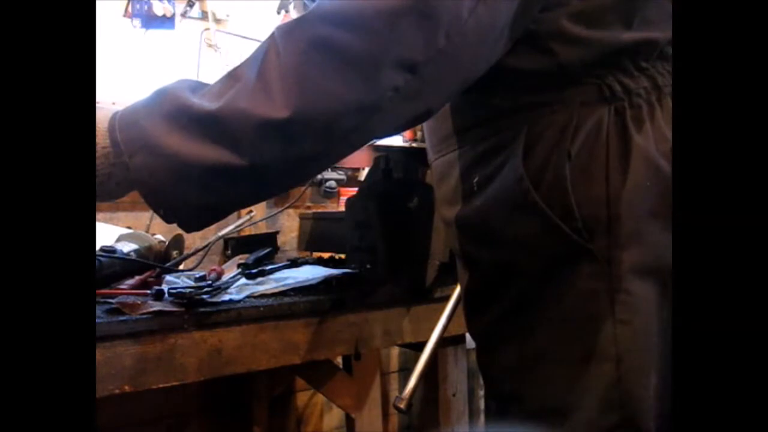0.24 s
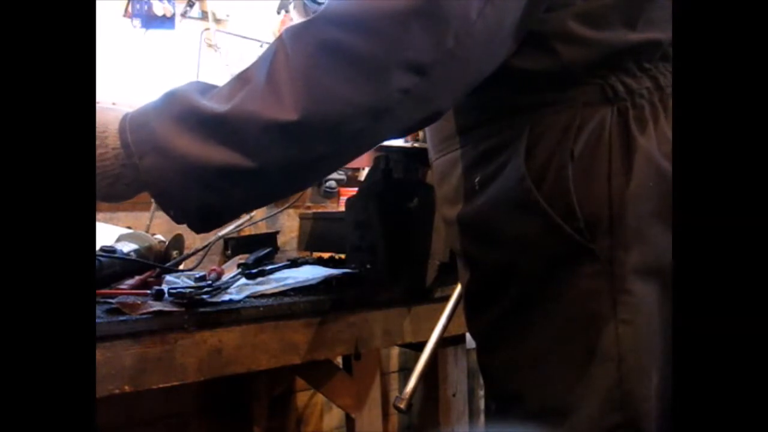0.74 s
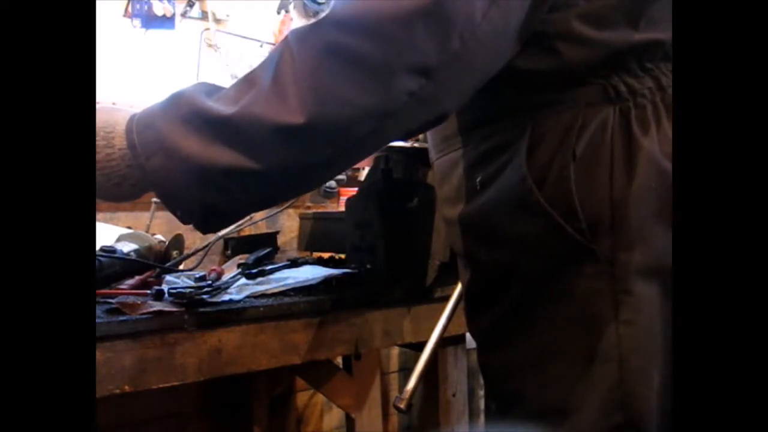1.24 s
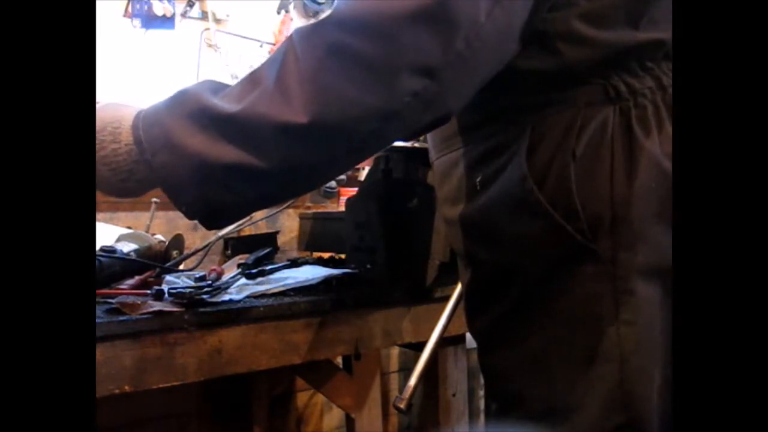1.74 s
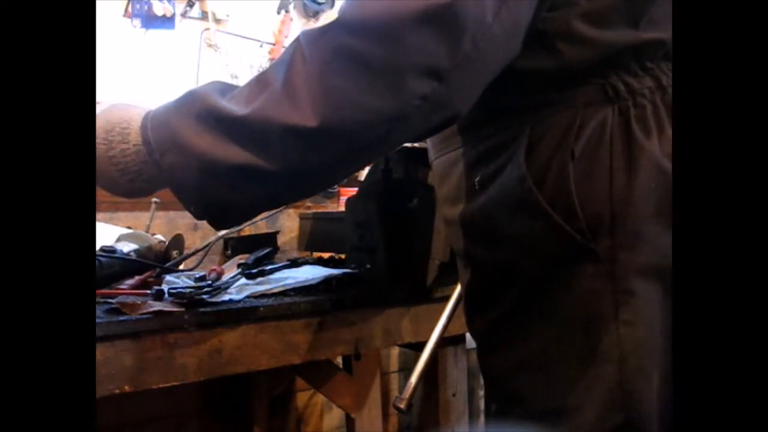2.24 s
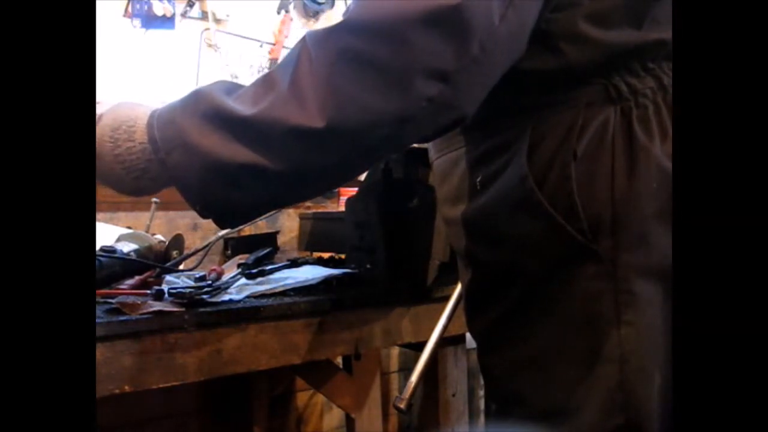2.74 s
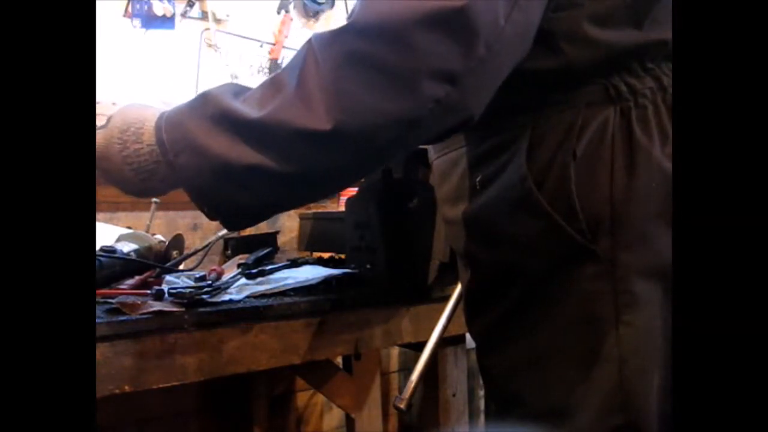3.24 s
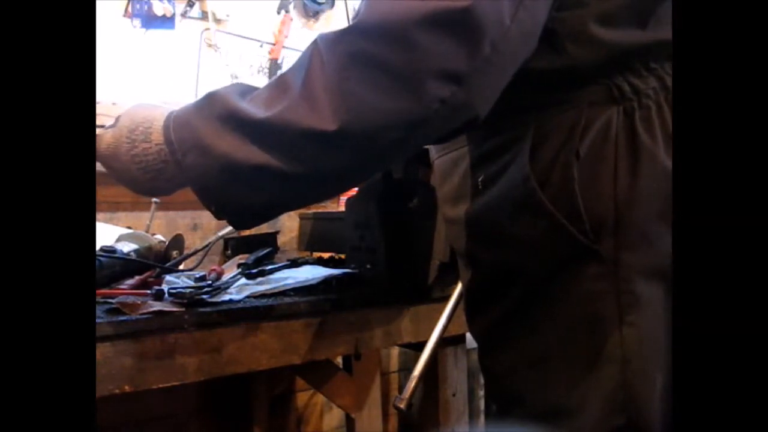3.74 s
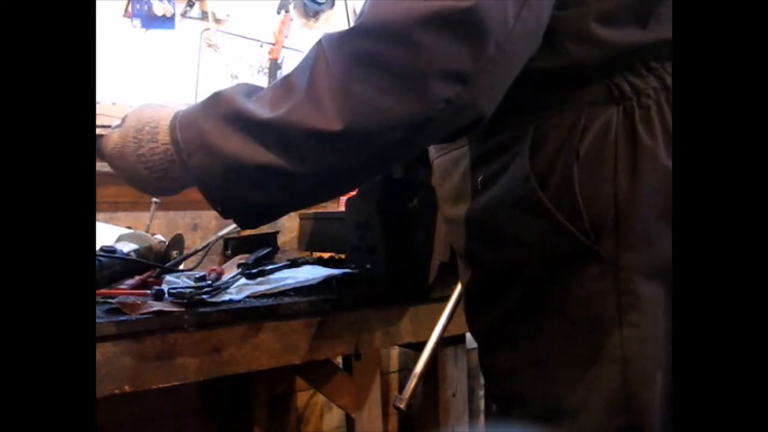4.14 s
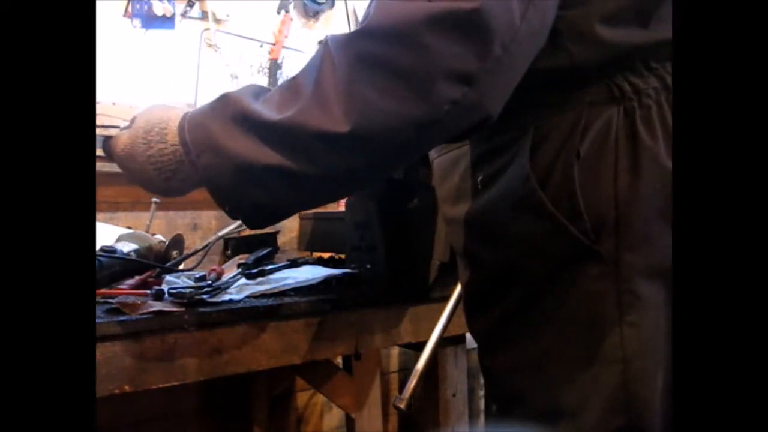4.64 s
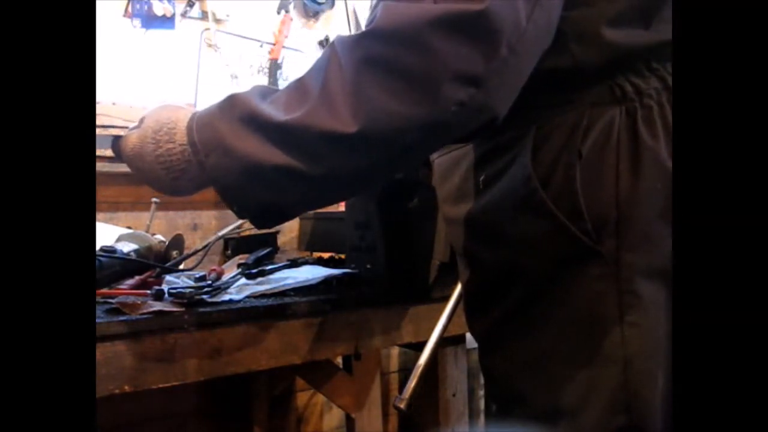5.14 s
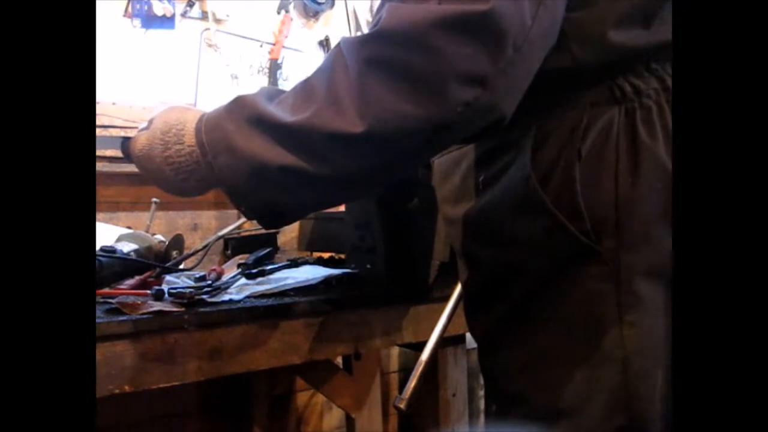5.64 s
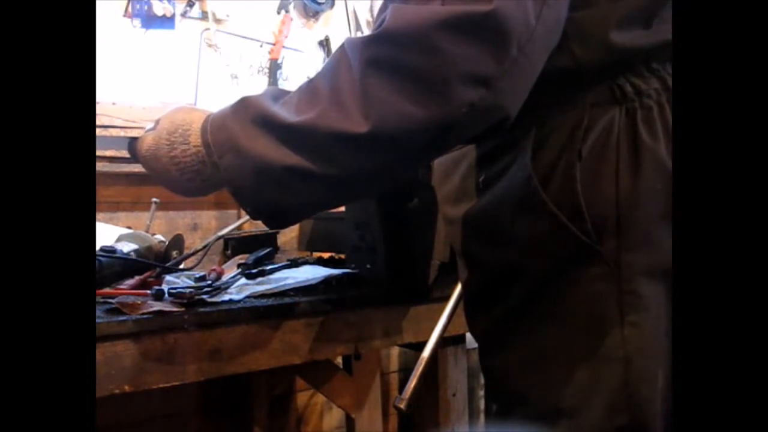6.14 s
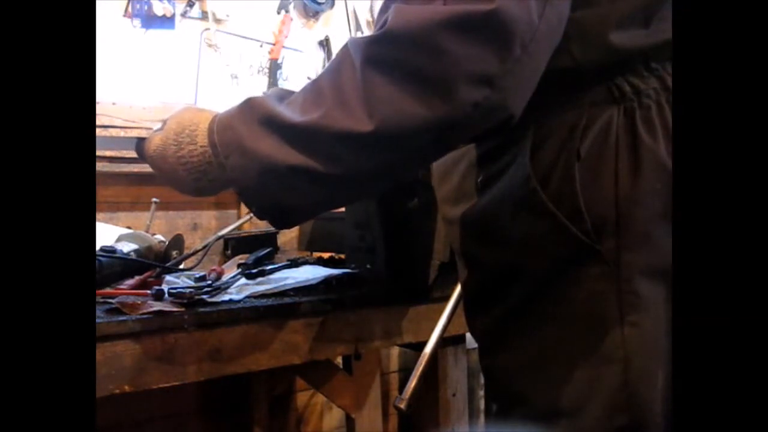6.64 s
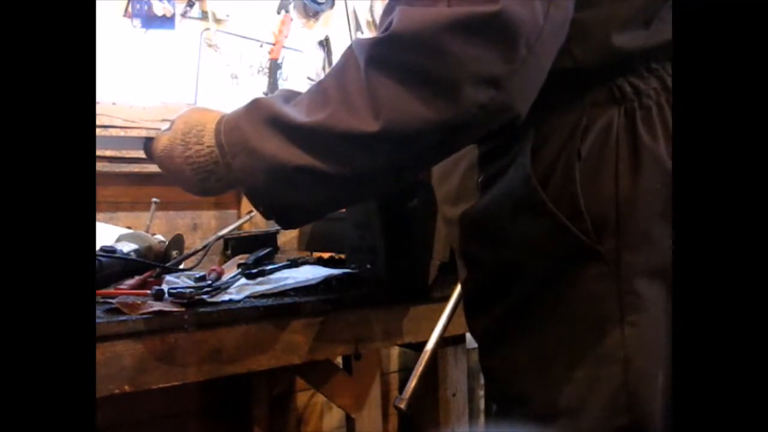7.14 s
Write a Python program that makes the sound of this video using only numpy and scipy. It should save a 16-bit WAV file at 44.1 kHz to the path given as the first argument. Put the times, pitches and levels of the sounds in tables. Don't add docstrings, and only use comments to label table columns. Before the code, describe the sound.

An electric jigsaw cuts sheet steel close by, a harsh rattling buzz with a metallic whine that sags, then climbs and holds.

```python
import sys
import numpy as np
from scipy import signal
from scipy.fft import rfft, irfft
from scipy.io import wavfile
from scipy.ndimage import uniform_filter1d

SR = 44100
rng = np.random.default_rng(int(sys.argv[2]) if len(sys.argv) > 2 else 0)


def dump_mix(stems):
    frames = np.atleast_2d(stems).T
    limited = np.clip(frames, -1, 1)
    pcm = np.round(limited * 32767).astype(np.int16)
    wavfile.write(sys.argv[1], SR, pcm)


def elevation(decibels):
    levels = np.asarray(decibels, float)
    return 10 ** (levels / 20)


N = 325892

# pitch_hz, width_hz, lift_db
RING_1 = [(1190, 92, 11), (1470, 55, 6), (2220, 31, 5), (2390, 140, 2), (2660, 116, 5), (2920, 43, 2),
          (3240, 103, 10), (3540, 55, 10), (4130, 128, 3), (4470, 140, 5), (4930, 67, 4), (5110, 140, 6),
          (5960, 42, 4), (6210, 140, 5), (6670, 50, 3), (6900, 76, 5), (7170, 49, 4), (7420, 84, 4),
          (8420, 55, 5), (9220, 120, 5), (11270, 62, 5), (11710, 97, 6), (13600, 67, 6), (14270, 64, 5)]
RING_2 = [(430, 78, 9), (860, 48, 6), (1460, 73, 6), (1630, 56, 4), (2400, 117, 8), (2930, 73, 4),
          (3230, 140, 9), (3370, 28, 6), (3620, 31, 3), (4120, 140, 4), (4430, 61, 5), (4640, 40, 4),
          (4860, 63, 5), (5080, 113, 5), (5760, 82, 4), (5960, 79, 7), (6420, 69, 5), (6890, 48, 5),
          (7210, 61, 5), (8370, 78, 7), (8880, 140, 5), (10610, 72, 5), (11320, 67, 5), (14000, 137, 6)]
RING_3 = [(970, 121, 6), (1210, 87, 6), (1740, 42, 6), (2000, 110, 6), (2770, 56, 6), (3100, 108, 3),
          (3560, 71, 7), (3780, 50, 4), (4140, 140, 11), (4650, 56, 3), (5090, 86, 8), (6150, 127, 8),
          (6340, 51, 3), (6630, 43, 4), (6760, 54, 6), (7090, 105, 7), (7570, 70, 4), (8100, 57, 4),
          (8400, 88, 8), (8950, 140, 5), (10030, 75, 5), (10230, 65, 5), (11290, 108, 6), (13450, 95, 5)]
RING_4 = [(430, 107, 9), (1060, 50, 4), (1270, 33, 6), (1410, 54, 4), (1770, 34, 4), (1960, 93, 8),
          (2410, 140, 3), (2670, 107, 6), (3100, 70, 4), (3380, 43, 3), (3560, 83, 6), (3990, 140, 10),
          (5090, 108, 10), (5560, 57, 5), (6100, 132, 6), (6750, 59, 4), (7070, 140, 5), (7520, 128, 5),
          (8470, 132, 6), (8980, 113, 5), (9490, 114, 6), (10810, 64, 5), (11040, 115, 6), (12410, 54, 5)]
RING_5 = [(430, 96, 8), (1420, 45, 1), (1760, 86, 4), (1950, 73, 2), (2510, 36, 4), (2760, 45, 8),
          (3110, 46, 8), (3220, 61, 9), (3560, 84, 5), (3820, 37, 4), (4020, 140, 11), (4150, 27, 9),
          (5030, 135, 6), (5620, 52, 5), (6040, 140, 5), (6600, 52, 3), (6830, 140, 5), (7570, 78, 6),
          (8030, 39, 4), (8400, 135, 7), (9070, 140, 6), (9350, 99, 7), (11080, 61, 5), (11240, 140, 6)]
STAGE_MIDDLES = [0.649, 1.701, 3.401, 5.151, 6.5]
# pitch_hz, level_db
CHIP_COLOUR = [(300, -33.5), (600, -21), (1200, -15), (1900, -8.5), (2500, -1), (3650, 0), (4150, -3),
               (4500, -9.5), (5500, -11.5), (7000, -12), (9000, -7.5), (13500, -11), (16000, -16.5)]
# pitch_hz, level_db
HISS_COLOUR = [(12, -60), (20, -38), (255, -33.5), (420, -25.5), (800, -16.5), (1900, -7), (2700, -2.5),
               (3900, -6.5), (4700, -8.5), (6200, -3.5), (7500, -5), (10000, -14), (14000, -13.5),
               (16000, -22.5)]
# pitch_hz, level_db
RUB_COLOUR = [(500, -19.5), (900, -3.5), (1250, -2), (1700, -6.5), (2600, -25)]
# pitch_hz, level_db
DRONE_COLOUR = [(200, -44), (300, -6.5), (370, -3), (480, -9.5), (700, -2), (1000, -20)]
# time_s, strokes_per_s
MOTOR_SPEED = [(0, 19.94), (0.45, 20.0), (0.75, 18.59), (1.3, 18.51), (1.7, 17.35), (2.0, 17.52),
               (2.55, 21.09), (2.9, 22.0), (3.2, 22.45), (3.6, 23.02), (4.4, 22.44), (5.0, 22.5),
               (5.5, 22.76), (6, 22.58), (7.39, 22.75)]
# time_s, sheet_looseness_db, cutting_level_db,
# tooth_squareness_db
HAND_ON_WORK = [(0.0, -1, 2.5, 4), (.55, -0.5, 2.5, 2), (.9, -1, -.5, -1.5), (1.3, 2, -0.5, 0.5),
                (1.9, 0, 0.5, 2), (2.35, 0, -1.5, 5.5), (2.75, -0.5, -0.5, 5.5), (3.3, -2, 0.5, 1),
                (4.3, -4.5, -2, 1.5), (4.55, -0.5, 0, -0.5), (5.4, 2, 0, -3.5), (6.2, 2.5, 0, -2.5),
                (6.6, -1.5, 1.5, 3.5), (7.39, -2, 2.5, 1)]
# start_s, frames_in_a_row
BARE_MOMENTS = [(0.242, 1), (0.562, 2), (0.839, 2), (0.903, 1), (1.223, 1), (1.309, 1), (1.437, 1),
                (1.757, 1), (1.799, 1), (1.949, 1), (2.013, 1), (2.205, 1), (2.546, 1), (2.845, 1),
                (2.994, 1), (3.165, 1), (3.314, 2), (3.698, 1), (3.847, 1), (4.082, 1), (4.189, 1),
                (4.253, 1), (4.402, 1), (4.466, 1), (4.509, 1), (4.807, 1), (4.914, 1), (4.957, 1),
                (5.063, 1), (5.17, 1), (5.234, 1), (5.703, 2), (5.767, 1), (5.81, 1), (6.066, 1), (6.13, 1),
             (6.535, 1), (6.877, 1), (6.962, 3), (7.239, 2), (7.367, 1)]
BARE_TONES = (9, 19)

FIRST_STROKE, FREE_SPEED = -.29, 22.6
TEETH_PER_STROKE = 179
WHISTLE = 1.53
# (dB, dB per stroke per s)
BITE_DB, HISS_DB, RUB_DB, DRONE_DB = (-30.5, 0.31), (-27.5, -0.045), (-44, 0.36), (-56, -0.66)
TONE_DB, WHISTLE_DB, SHAKE_DB = (-36.5, 0.85), (-5, -1.45), (-72.5, -2)


def evened(x):
    return x / np.sqrt(np.mean(x ** 2) + 1e-20)


def curves(rows):
    s, *columns = np.transpose(rows)
    return [np.interp(np.arange(N) / SR, s, c) for c in columns]


def level(rule, speed):
    free_db, load_db = rule
    return elevation(free_db + load_db * (FREE_SPEED - speed))


def colour(x, points):
    f, db = np.transpose(points)
    hz = np.fft.rfftfreq(len(x), 1 / SR)
    gain_db = np.interp(np.log(hz + 1), np.log(f), db, left=-70, right=-70)
    return irfft(rfft(x) * elevation(gain_db), len(x))


def resonate(x, hz, width):
    turn = np.exp(2j * np.pi * np.cumsum(hz) / SR)
    r = np.exp(-np.pi * width / SR)
    return 2 * (turn * signal.lfilter([1 - r], [1, -r], x / turn)).real


def pulse(turns, start, rise, fall, spread_db):
    lap = turns - start + 2
    u = lap % 1
    strength = elevation(spread_db * rng.standard_normal(200))[lap.astype(int)]
    return strength * (1 - np.exp(-(u / rise) ** 2)) * np.exp(-u / fall)


def chips(turns, speed):
    clicks = (rng.random(N) < 14000 / SR) * rng.standard_normal(N)
    burst = .18 + evened(pulse(turns, start=.76, rise=.14, fall=.15, spread_db=1.2))
    torn = colour(evened(clicks) * burst, CHIP_COLOUR)
    return elevation(-3.5) * level(BITE_DB, speed) * evened(torn)


def cutting_hiss(turns, speed):
    swell = 4.0 + evened(pulse(turns, start=.8, rise=.16, fall=.3, spread_db=1.5))
    hiss = colour(rng.standard_normal(N) * swell, HISS_COLOUR)
    return elevation(-3) * level(HISS_DB, speed) * evened(hiss)


def teeth(turns, speed):
    top_hz = TEETH_PER_STROKE * speed
    uneven = 1 + .015 * evened(uniform_filter1d(rng.standard_normal(N), 200))

    knock = .25 + evened(pulse(turns, start=.8, rise=.13, fall=.12, spread_db=1.3))
    whine = knock * np.sin(2 * np.pi * np.cumsum(top_hz * uneven) / SR)

    blade_speed = abs(np.cos(2 * np.pi * (turns - .96)))
    entry = evened(pulse(turns, start=.74, rise=.08, fall=.07, spread_db=1.0))
    sweep = entry * np.sin(2 * np.pi * np.cumsum(top_hz * blade_speed * uneven ** 3) / SR)

    whistle = resonate(rng.standard_normal(N), WHISTLE * top_hz, 72.0)
    tones = evened(whine) + elevation(-4.0) * evened(sweep)
    tones += elevation(2.0) * level(WHISTLE_DB, speed) * evened(whistle)
    return elevation(-2.5) * level(TONE_DB, speed) * tones


def sheet(drives, contrasts, sharpness, fine_db):
    hz, t, out = np.fft.rfftfreq(8192, 1 / SR), np.arange(N) / SR, 0
    for k, modes in enumerate([RING_1, RING_2, RING_3, RING_4, RING_5]):
        share = np.sqrt(np.interp(t, STAGE_MIDDLES, np.eye(len(STAGE_MIDDLES))[k]))
        lift_db = sum(db / (1 + 2j * sharpness * (hz - f) / width) for f, width, db in modes)
        fine_hz = rng.uniform(500, 15000, (160, 1))
        sign = rng.choice([-1, 1], (160, 1))
        lift_db = lift_db + (fine_db * sign / (1 + 2j * (hz - fine_hz) / 45.)).sum(axis=0)
        for drive, contrast in zip(drives, contrasts):
            ring = irfft(10 ** (contrast * lift_db / 20))
            out = out + signal.oaconvolve(drive * share, ring)[:N]
    return out


def blade_rub(drag, speed):
    rub = colour(rng.standard_normal(N) * drag, RUB_COLOUR)
    return level(RUB_DB, speed) * evened(rub)


def bench_drone(drag, speed):
    drone = colour(rng.standard_normal(N) * drag, DRONE_COLOUR)
    return level(DRONE_DB, speed) * evened(drone)


def bench_shake(turns, speed):
    return elevation(-3.5) * level(SHAKE_DB, speed) * np.sin(4 * np.pi * turns)


def workshop(x):
    at = np.arange(150, SR // 3, 22)
    taps = np.zeros(SR // 3 + 22)
    fade = elevation(-60 * at / SR / .25)
    taps[at + rng.integers(0, 22, len(at))] = rng.choice([-1., 1.], len(at)) * fade
    return signal.fftconvolve(x, taps / np.linalg.norm(taps))[:N]


def scene():
    (speed,) = curves(MOTOR_SPEED)
    loose_db, cutting_db, square_db = curves(HAND_ON_WORK)
    turns = FIRST_STROKE + np.cumsum(speed) / SR

    drive = chips(turns, speed) + cutting_hiss(turns, speed)
    drive *= elevation(cutting_db)
    drag = .6 + evened(pulse(turns, start=.48, rise=.094, fall=.45, spread_db=1.0))
    drive += elevation(loose_db - 5.5) * blade_rub(drag, speed)
    drive += elevation(.8 * loose_db + .8 * cutting_db - 4.5) * bench_drone(drag, speed)

    whine = elevation(square_db - 3.5) * teeth(turns, speed)
    saw = elevation(-3.5) * sheet([drive, whine], [1.3, .6], sharpness=.98, fine_db=2.0)
    saw += bench_shake(turns, speed)
    return (saw + elevation(-8.5) * workshop(saw))[None]


def camera_rounding(x, step_db, wander_db, follow, fill, tone, spread=.86):
    hop, lead, top_bin, band_bins = 1024, 352, 672, 16
    u = np.pad(signal.resample_poly(x, 160, 147), (2 * hop - lead, 3 * hop))
    n, frames = np.arange(2 * hop), len(u) // hop - 1

    basis = np.cos(np.pi / hop * np.outer(n + .5 + hop / 2, np.arange(top_bin) + .5))
    basis *= np.sin(np.pi * (n[:, None] + .5) / (2 * hop))
    z = u[hop * np.arange(frames)[:, None] + n] @ basis

    strength = np.sqrt((z ** 2).reshape(frames, -1, band_bins).mean(axis=2))
    band = np.repeat(strength, band_bins, axis=1) + 1e-9
    band = np.minimum(band ** follow, 2 * band)
    step = band * elevation(step_db + wander_db * rng.standard_normal((frames, 1)))
    q = np.round(z / step)
    faint = fill * np.sign(rng.standard_normal(z.shape))
    rounded = step * np.where(q == 0, faint, q)

    bare = []
    for s, run in BARE_MOMENTS:
        first = round((s * 48000 - lead) / hop) + 1
        bare += [first + j for j in range(run)]
    for k, kept in zip(bare, rng.integers(*BARE_TONES, len(bare))):
        weight = band[k] ** spread
        height = abs(z[k]) / weight
        edge = np.sort(height)[-int(kept)]
        rounded[k] = (height >= edge) * np.sign(z[k]) * tone * edge * weight

    parts = (rounded @ basis.T * 2 / hop).reshape(frames, 2, hop)
    y = (parts[1:, 0] + parts[:-1, 1]).ravel()[hop - lead:]
    return signal.resample_poly(y, 147, 160)[:N]


def top_cut(x):
    return signal.sosfilt(signal.butter(12, 16330, fs=SR, output="sos"), x)


def record(dry):
    heard = camera_rounding(dry[0], step_db=2.0, wander_db=2.0, follow=.75, fill=.25, tone=2.1)
    return top_cut(heard[None])


dry = scene()
out = record(dry)
dump_mix(out)
```